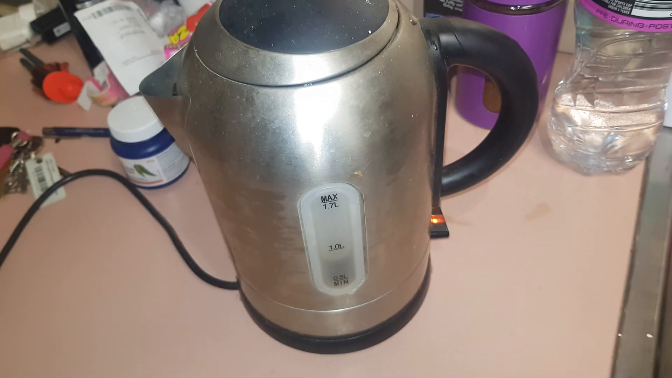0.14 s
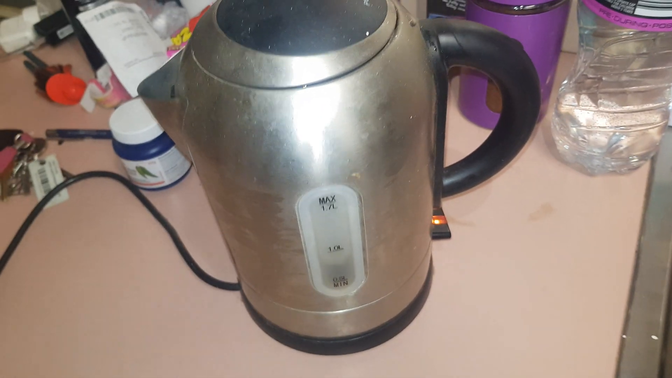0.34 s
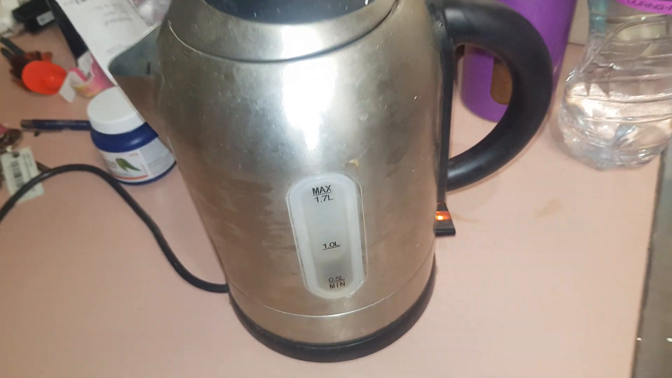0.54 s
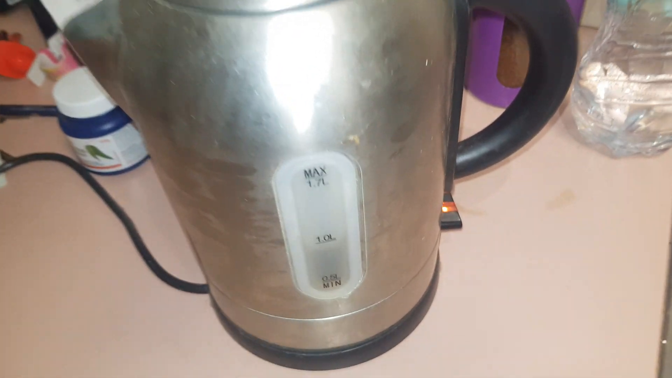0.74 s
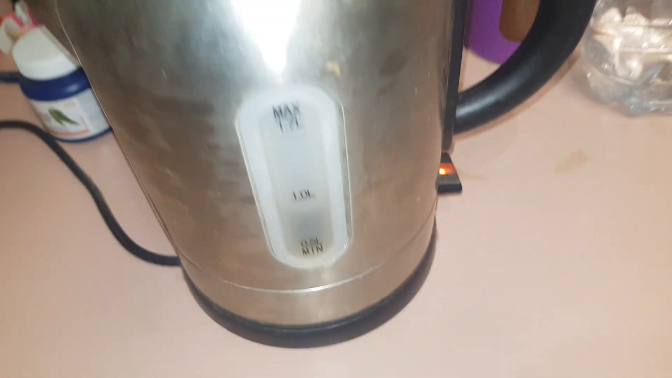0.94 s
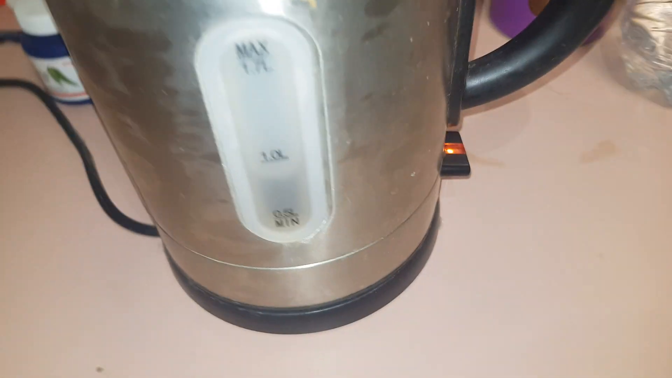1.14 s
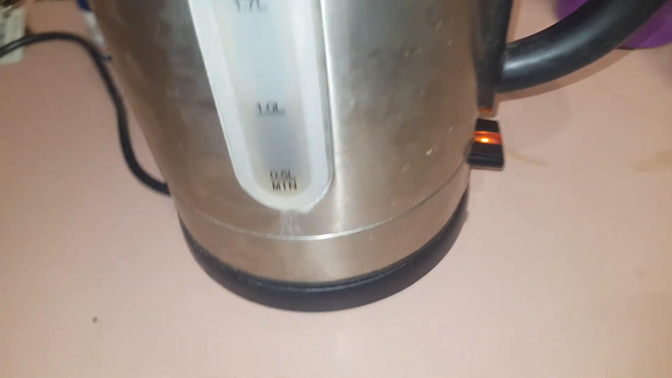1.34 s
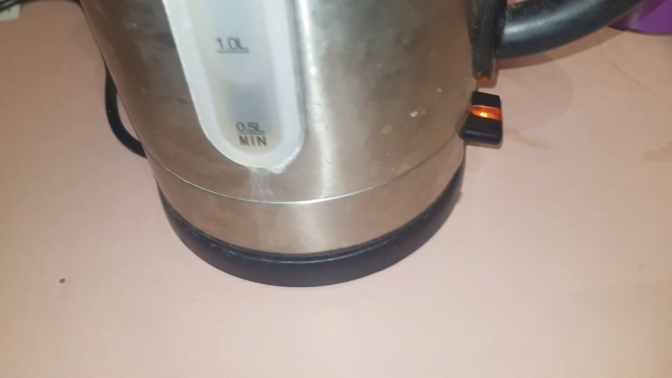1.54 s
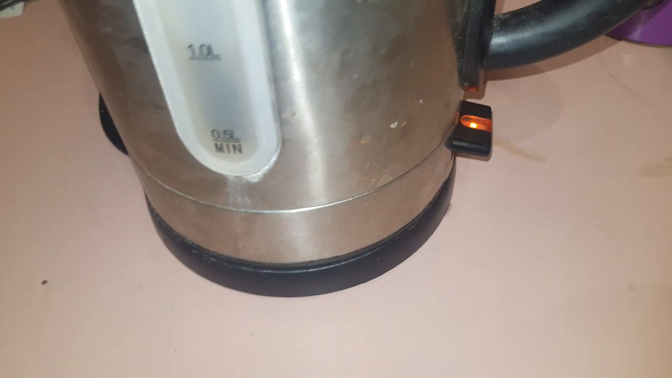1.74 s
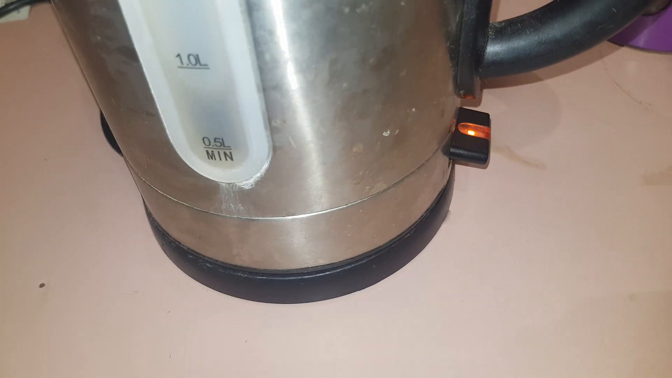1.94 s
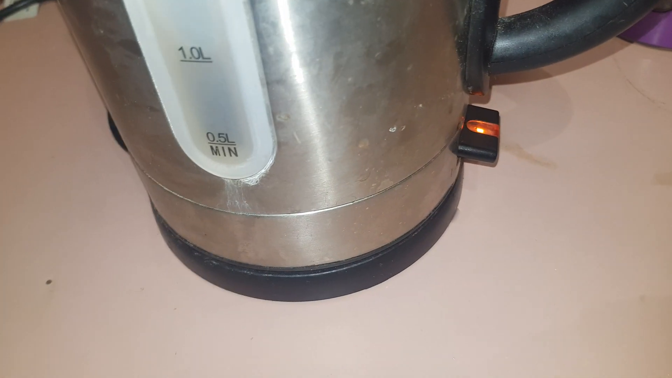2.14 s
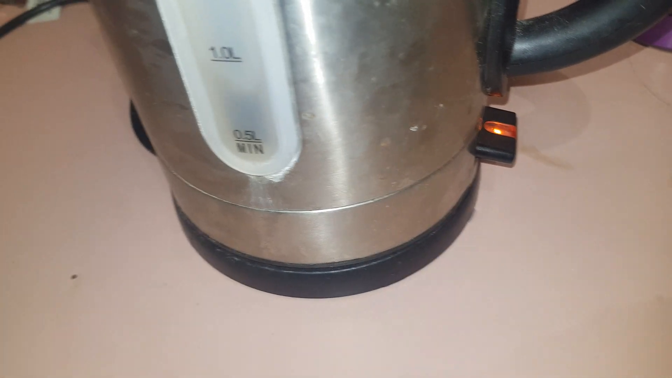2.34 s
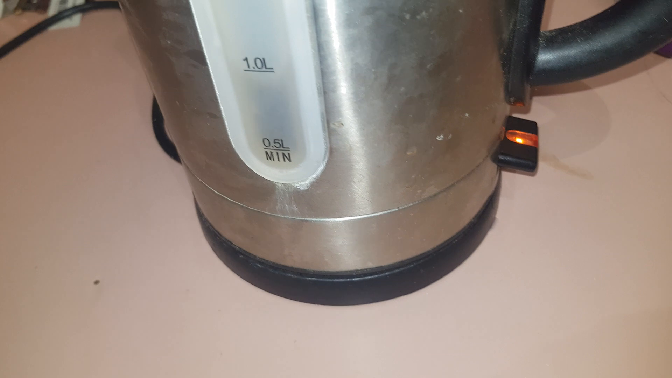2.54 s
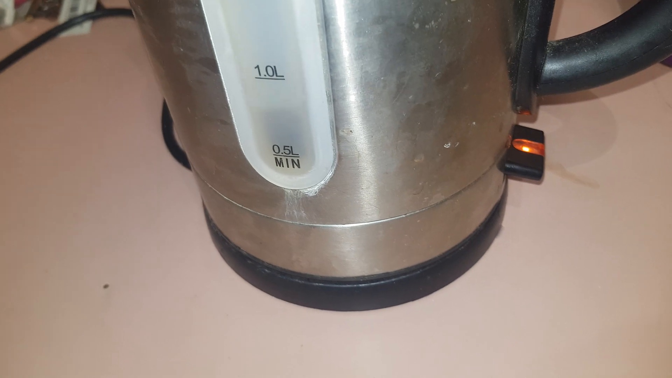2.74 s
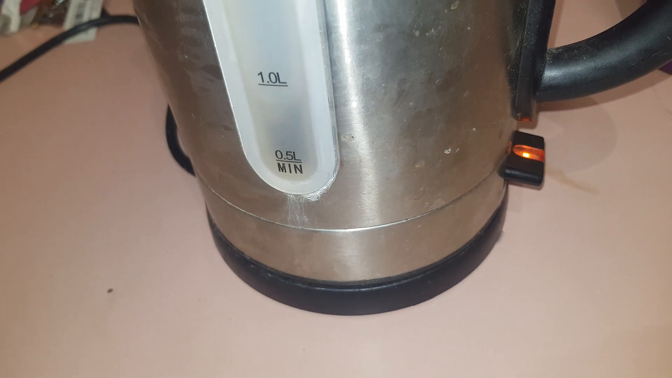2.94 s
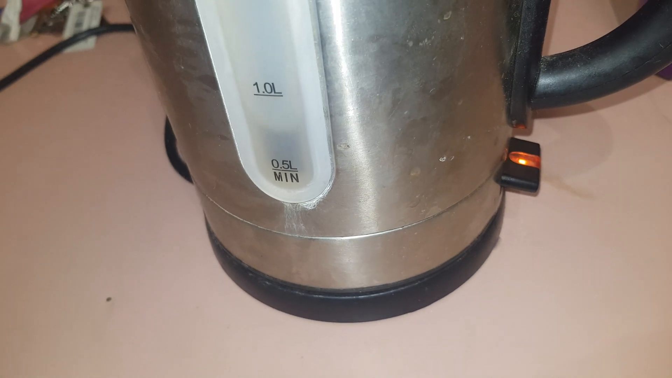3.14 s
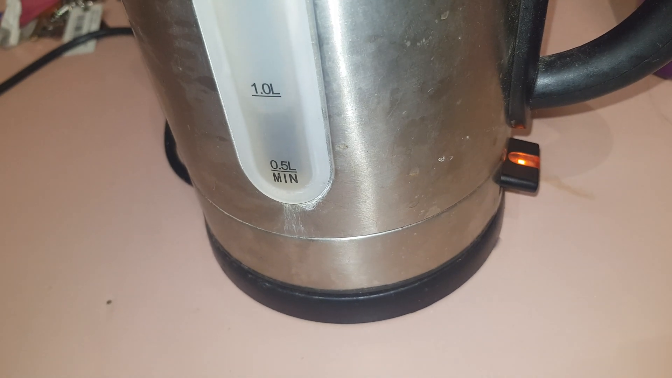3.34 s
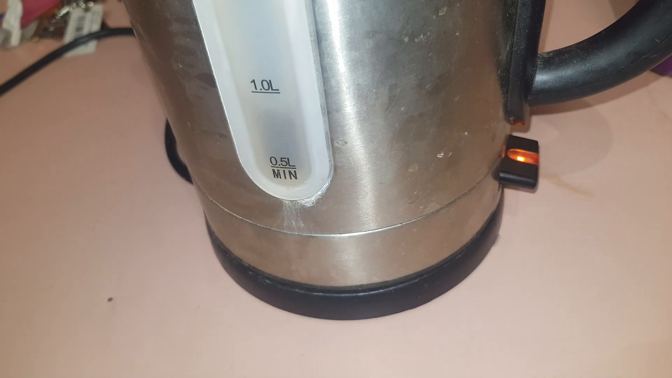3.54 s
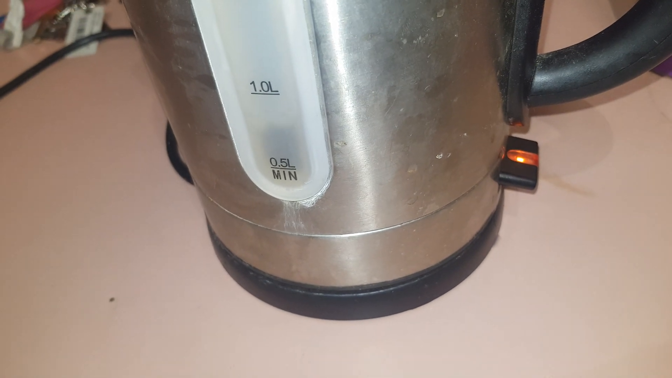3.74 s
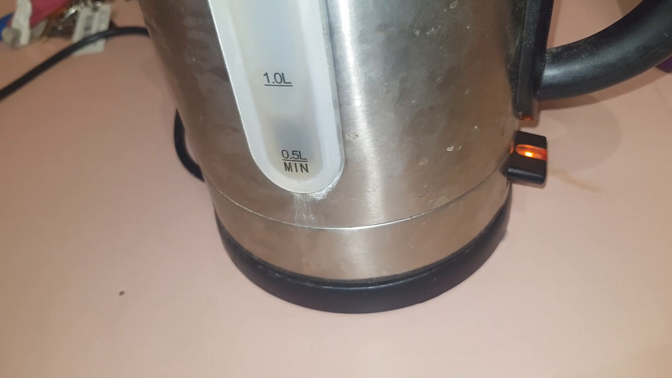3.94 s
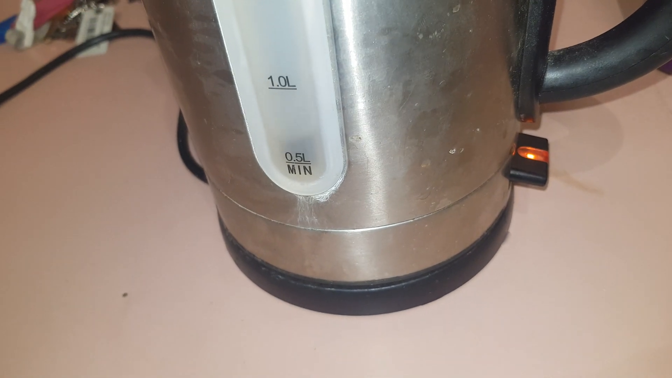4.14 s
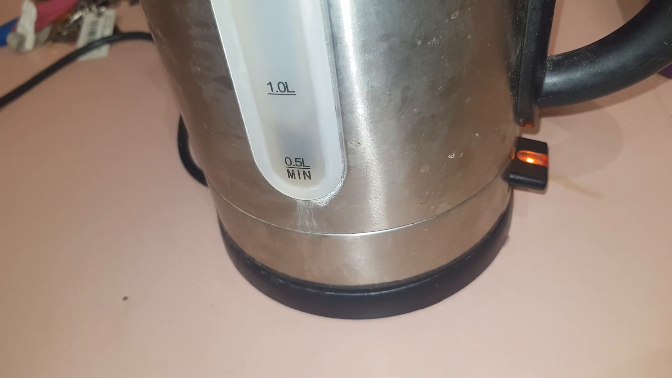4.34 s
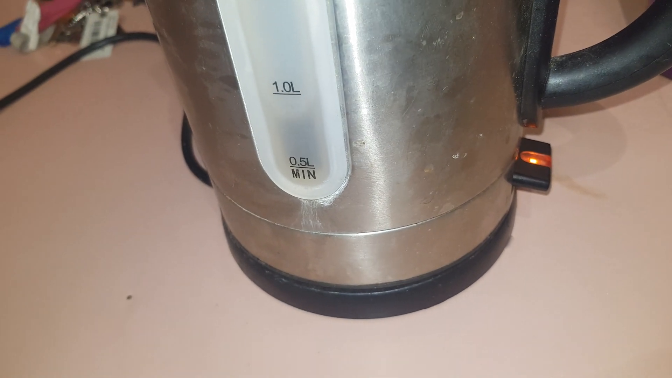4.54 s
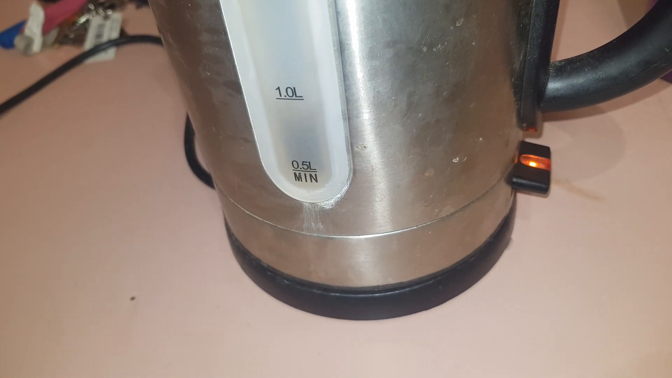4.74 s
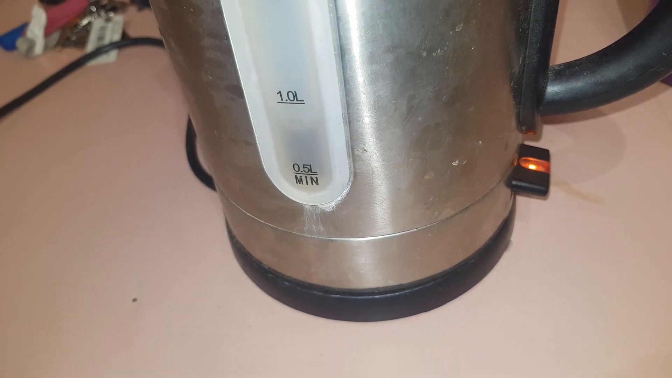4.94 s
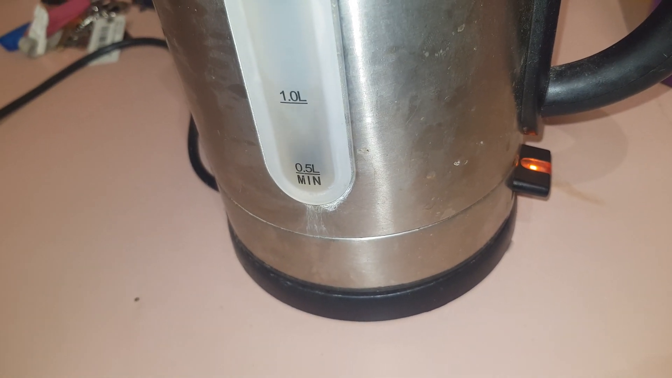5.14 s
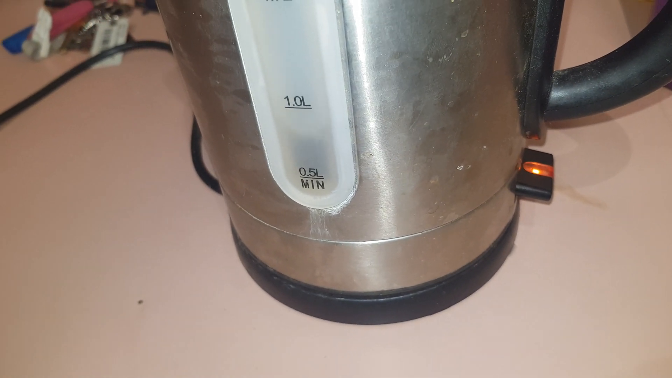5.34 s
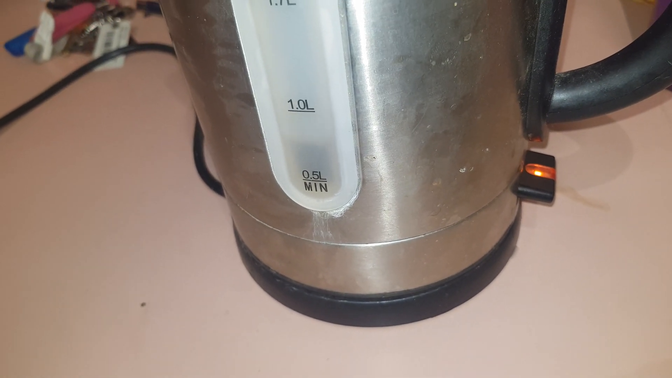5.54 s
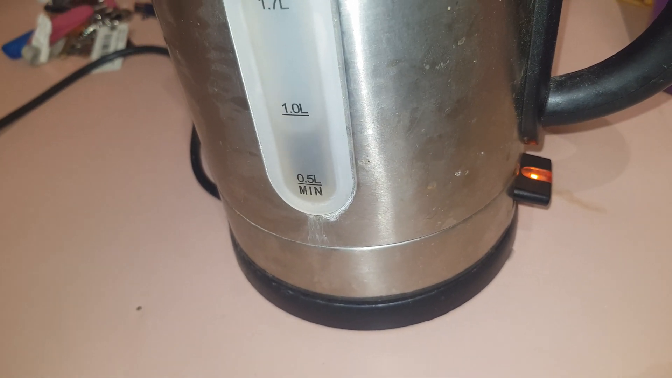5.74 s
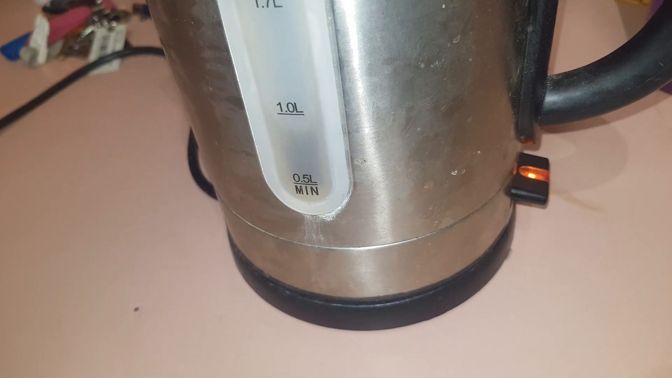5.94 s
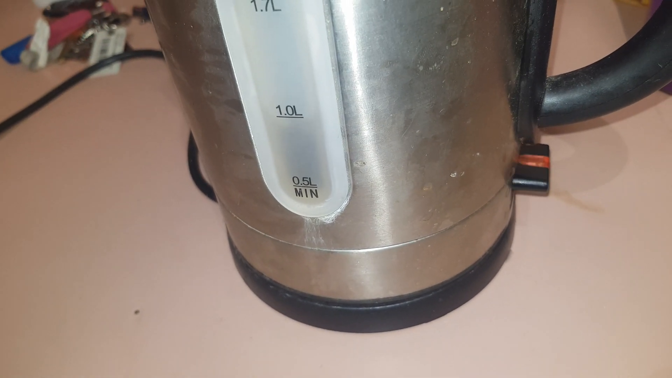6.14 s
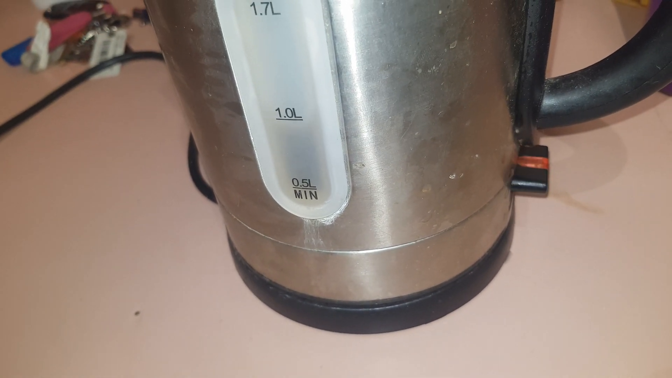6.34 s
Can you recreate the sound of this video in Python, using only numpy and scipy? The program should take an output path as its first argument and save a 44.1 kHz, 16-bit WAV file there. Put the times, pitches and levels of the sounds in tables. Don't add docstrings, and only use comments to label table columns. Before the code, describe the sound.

An electric steel kettle is already boiling hard on a kitchen counter. From 0 s there is a low, lumpy rumble with dull base thumps and soft gurgles, over a faint airy hiss. From 0.6 to 1.5 s the microphone moves in: bubbling and metallic crackle grow fuller, and a few gentle steam wafts pass between 0.7 and 1.4 s. A firm low knock lands at 1.7 s. From 2 to 6 s the boil stays vigorous and irregular, with swelling thumps, hollow bloops, small pops, wet drop ticks and tiny bright spits, densest around 4.2 to 5.6 s. At about 6.1 s a tiny slip leads straight into a hard, bright switch snap, much louder than everything else, rattling through quick bounces within 0.05 s, with a light low thud, a short metallic ring and small-room echo. The water keeps bubbling, slightly easing, until 6.5 s.

```python
import sys
import numpy as np
from scipy import signal
from scipy.fft import rfft, irfft, next_fast_len
from scipy.io import wavfile
from scipy.ndimage import map_coordinates

SR = 44100
rng = np.random.default_rng(int(sys.argv[2]) if len(sys.argv) > 2 else 0)


def master_out(mix):
    frames = np.transpose(np.atleast_2d(mix))
    ceiling = np.clip(frames, -1, 1)
    pcm = np.round(ceiling * 32767).astype(np.int16)
    wavfile.write(sys.argv[1], SR, pcm)


def how_loud(loudness_db):
    steps = np.asarray(loudness_db, float) / 20
    return 10 ** steps


N = 285768

# [t/s, level/dB]
VIGOUR = [
    (0.0, -3),
    (0.6, -2),
    (1.0, -1.5),
    (1.5, 0.5),
    (3.4, 0),
    (4.45, 0),
    (4.85, -0.5),
    (5.2, 0),
    (6.48, -1),
]
# [t/s, length/s, heave/dB, slosh/dB]
SURGES = [(.02, 0.068, 6, 1), (.3, 0.086, 3.5, -6), (.72, 0.06, -0.5, -5), (.85, 0.068, 3.5, 0),
          (1.1, 0.065, 2.5, -0.5), (1.6, 0.055, 0, -1.5), (1.19, 0.022, 10, -16), (1.32, 0.05, 6.5, 2),
          (1.52, 0.082, 5.5, 0.5), (1.7, 0.016, 9, 1), (2.13, 0.2, 3, 0), (2.33, 0.096, 3, 2),
          (2.53, 0.048, 5.5, 1.5), (2.75, 0.21, 3, 0.5), (2.98, 0.099, 3.5, 2.5), (3.25, 0.13, 0, 2),
          (3.45, 0.22, 5, 2.5), (3.74, 0.075, 4.5, 3.5), (3.99, 0.028, 8.5, 0), (4.1, 0.071, 0.5, 6),
          (4.19, 0.019, 7.5, 2.5), (4.3, 0.11, -1.5, 0.5), (4.4, 0.13, 6, 0.5), (4.55, 0.074, 3, 0),
          (4.75, 0.076, 0, -2), (5.07, 0.11, 3, 0.5), (5.23, 0.031, -4.5, 4), (5.5, 0.049, 2.5, -2),
          (5.92, 0.033, 0, 8), (6.12, 0.053, 1.5, 1.5), (6.3, 0.06, 4, 0)]
# [t/s, length/s, level/dB]
HISS_SWELLS = [
    (.7, 0.16, 4.5),
    (1.0, 0.13, 5),
    (1.22, 0.18, 5),
    (1.38, .08, 1),
]
# [f/Hz, width/Hz, level/dB]
COUNTER_MODES = [(55.5, 14, -2), (114.4, 6.6, 3), (132.5, 7.7, 2.5), (175.6, 9.8, 2.5)]
# [f/Hz, width/Hz, level/dB]
BASE_MODES = [(224.3, 12.6, 1.5), (281, 27.2, -3.5), (337.5, 26.4, -7.5), (412, 186, -18.5),
              (450.6, 22.3, 2), (514.5, 37, -3), (549.4, 39, 1.5), (640, 50, -16), (711, 60, -9),
              (880, 330, -18)]
# [f/Hz, width/Hz, level/dB]
SHELL_MODES = [(910, 360, 0.5), (1390, 178, 5.5), (1644, 267, 1.5), (2240, 250, -1), (2530, 280, -7.5),
               (2870, 400, -11), (4120, 810, -14.5), (7550, 270, -40), (11000, 1500, -24)]
BELLY_GROWS = [0.43, 2, 1.3]
# [t/s, peak level/dB, f/Hz]
KNOCKS = [(0.04, -23, 203), (0.962, -26, 260), (1.3, -30, 242), (1.703, -13.5, 220), (1.82, -37, 242),
          (2.753, -18, 240), (2.826, -15, 247), (3.015, -20, 223), (3.062, -23, 276), (3.344, -29, 221),
          (3.632, -24, 233), (3.819, -18, 263), (4.045, -39, 234), (4.323, -16, 270), (4.504, -16, 228),
          (4.603, -15, 232), (4.678, -22.5, 228), (4.724, -32, 202), (4.761, -25, 288), (4.801, -17, 327),
          (4.894, -23, 202), (5.089, -23, 284), (5.248, -30, 202), (5.554, -31, 235), (5.653, -27, 246),
          (5.788, -23, 263), (6.014, -23, 288), (6.04, -12.5, 275)]
# [t/s, peak level/dB, f/Hz]
BLOOPS = [(0.2156, -44, 3549), (0.3925, -32, 417), (0.5616, -39, 900), (0.761, -43, 620),
          (0.9645, -35, 410), (0.9757, -28, 418), (1.0651, -36, 2306), (1.1589, -34, 414),
          (1.301, -32, 630), (1.3089, -33, 420), (1.312, -27, 610), (1.3772, -28, 420),
          (1.5686, -30.5, 426), (1.7677, -43, 1500), (2.0025, -34, 908), (2.0027, -31, 624),
          (2.005, -24, 420), (2.0163, -39, 414), (2.1998, -38, 1509), (2.429, -27.5, 425),
          (2.4983, -39, 908), (2.502, -34, 614), (2.5691, -40, 908), (2.7841, -39, 2306),
          (2.8044, -28, 416), (2.8284, -34, 620), (2.9732, -25.5, 407), (2.9795, -46, 908),
          (2.9942, -39, 414), (3.0274, -43, 900), (3.1062, -41, 620), (3.215, -47, 3549),
          (3.3165, -47, 3549), (3.3524, -49, 3549), (3.3576, -38, 610), (3.4253, -28.5, 417),
          (3.4289, -48, 908), (3.4308, -37, 605), (3.5422, -29.5, 420), (3.5801, -30.5, 414),
          (3.6323, -33, 414), (4.1766, -30, 420), (4.2489, -37, 1509), (4.26, -32, 1509),
          (4.6147, -29, 416), (4.6157, -44, 1509), (4.6827, -41, 908), (4.8935, -25, 417),
          (5.1407, -39, 1509), (5.3097, -30, 417), (5.3272, -37, 1509), (5.3621, -32, 610),
          (5.452, -29, 423), (5.465, -31, 425), (5.5643, -46, 3549), (5.6823, -29, 427),
          (5.6905, -25.5, 407), (5.8016, -30.5, 414), (5.8734, -36, 410), (6.4308, -42, 1509)]
# [t/s, peak level/dB, f/Hz]
BEADS = [(0.6244, -43, 2467), (1.2091, -43, 1774), (1.259, -37, 1161), (1.377, -37, 2380),
         (1.5404, -39, 1774), (1.648, -44, 1774), (1.7687, -43, 3430), (2.0764, -45, 3489),
         (2.105, -40, 5224), (2.1161, -40, 2467), (2.1506, -47, 3489), (2.3385, -44, 1161),
         (2.699, -57, 1774), (2.793, -37, 1774), (2.8216, -40, 1774), (3, -38, 1170), (3.004, -37, 1774),
         (3.003, -48, 3489), (3.157, -41, 1760), (3.3168, -48, 3489), (3.4001, -46, 3489),
         (3.4014, -37, 1760), (3.482, -43, 3489), (3.8715, -39, 1161), (4.1976, -53, 3489),
         (4.204, -44, 3489), (4.218, -39, 2467), (4.218, -43, 1774), (4.2321, -47, 3489),
         (4.26, -38.5, 1774), (4.2672, -38, 1170), (4.3212, -48, 3489), (4.455, -40, 3400),
         (4.6156, -46, 1774), (4.7164, -44, 2467), (4.8018, -39, 1774), (4.9152, -37, 1774),
         (4.933, -37, 1774), (5.002, -40, 3430), (5.0067, -35, 1161), (5.0545, -42, 3489),
         (5.0956, -36, 1774), (5.102, -40, 1774), (5.141, -47, 5224), (5.142, -43, 3489),
         (5.2117, -43, 2467), (5.2317, -46, 1161), (5.325, -38, 1774), (5.343, -37, 1774),
         (5.3724, -44, 1774), (5.466, -38, 1774), (5.4786, -37, 1760), (5.501, -38, 1161),
         (5.502, -43, 3489), (5.571, -37, 2500), (5.6094, -38, 1161), (5.6267, -38.5, 1780),
         (5.8392, -38, 1760)]
# [t/s, peak level/dB, f/Hz]
POPS = [(0.415, -33.5, 853), (1.065, -33, 880), (1.151, -27.5, 890), (1.647, -41, 1480), (2.072, -28, 910),
        (2.271, -32, 880), (2.295, -22.5, 1330), (2.369, -33, 1090), (3.043, -31, 1150), (3.722, -37, 1400),
        (3.753, -27, 1360), (3.874, -32, 1530), (3.925, -33, 930), (4.078, -32, 1670), (4.197, -23.5, 1310),
        (4.25, -31, 1580), (4.455, -27, 1330), (4.613, -37, 1370), (4.761, -25.5, 1430),
        (4.804, -24.5, 1650), (4.838, -35, 890), (5.003, -30, 1510), (5.102, -32, 830), (5.141, -32, 840),
        (5.232, -25, 1490), (5.252, -31.5, 970), (5.371, -28.5, 1670), (5.417, -32, 860), (5.56, -28, 1510),
        (5.912, -31, 1390)]
# [t/s, peak level/dB, f/Hz]
GULPS = [(0.278, -28, 450), (0.671, -25, 514), (0.723, -27, 530), (2.072, -39, 560), (2.756, -38, 480),
         (2.883, -23, 480), (3.815, -41, 574), (4.838, -31.5, 540), (5.233, -42, 455), (5.669, -27.5, 549)]
# [t/s, peak level/dB, f/Hz, t60/s]
PLINKS = [
    (0.047, -35, 1694, 0.084),
    (6.09, -24, 2400, 0.018),
]
# [t/s, peak level/dB, f/Hz, left over right/dB]
DROPS = [(0.3247, -36, 2500, 0), (0.5736, -37, 2200, -1.5), (1.3758, -33, 2200, -0.5),
         (1.6472, -38, 2300, 3), (1.7684, -32, 2260, 6), (1.948, -35, 2240, 3), (2.1041, -38, 2360, 0),
         (2.2942, -38, 2330, -5), (2.3521, -33, 2270, 0), (2.5626, -34.5, 2390, 1),
         (2.7611, -37.5, 2330, 5), (3.044, -36, 2100, -4), (3.1228, -37.5, 2260, 1),
         (3.2809, -35.5, 2540, 1), (3.3164, -36, 2240, 2), (3.8147, -30.5, 2680, 10),
         (3.9015, -35, 2230, 5), (4.1979, -40, 2200, -3), (4.2492, -36, 2250, -1.0),
         (4.337, -31.5, 2370, 5), (4.4538, -37.5, 2330, 0), (4.6139, -31, 2430, 3), (4.7616, -36, 2290, 7),
         (4.8529, -35, 2200, -3), (4.9127, -41, 2440, 10), (5.0015, -32, 2410, 3), (5.033, -40, 2430, 2.0),
         (5.1018, -36, 2250, 1), (5.3243, -42, 2160, 1), (5.4286, -36, 2460, 5),
         (0.052, -40, 2220, -1), (1.4825, -37, 2250, 4), (1.5406, -45, 2190, -1),
               (1.937, -40, 2220, -2), (2.17, -40, 2530, 6), (2.893, -38.5, 2000, 3),
               (3.2163, -39, 2350, 4), (3.7304, -42, 2340, -3), (3.757, -39.5, 2230, -1),
               (3.864, -45, 2280, 12), (3.912, -35.5, 2200, 2.0), (4.231, -38, 2220, 0),
               (4.385, -36, 2220, 1), (4.488, -38, 2300, 2), (4.7117, -43, 2290, -6),
               (4.733, -33.5, 2110, 3), (4.805, -48, 2030, -1), (4.8804, -41, 2230, -2),
               (4.983, -38, 2490, 4.5), (5.048, -33.5, 2240, 3), (5.142, -43, 2240, -5),
               (5.1947, -39, 2680, 5), (5.23, -38, 2370, 2), (5.561, -36, 2010, 5), (5.736, -44, 2480, 8),
               (6.3288, -27.5, 2290, 3), (6.3954, -43, 2240, 9), (6.4313, -49, 2260, 1.0)]
# [t/s, peak level/dB, f/Hz]
SPITS = [(0.304, -43, 7410), (0.445, -40, 5970), (0.662, -42, 11300), (1.0508, -36.5, 7360),
         (1.7679, -52, 5270), (1.8004, -47, 5010), (2.104, -30, 10400), (2.311, -40, 6120),
         (2.3391, -45, 11900), (2.5162, -46, 11400), (2.8846, -38, 11200), (2.9642, -44, 5020),
         (3.0031, -46, 11000), (3.1073, -44, 10800), (3.281, -45, 5110), (3.317, -44, 10600),
         (3.8147, -48, 6550), (4.196, -38, 5150), (4.3372, -39, 7000), (4.454, -43, 5800),
         (5.004, -42.5, 6980), (5.1417, -50, 5400), (5.3253, -48, 11800), (5.4271, -44, 6710),
         (5.465, -45, 10900), (5.5034, -43, 11800), (5.5647, -37.5, 7610), (5.6124, -36, 12700),
         (5.8945, -44, 5850), (5.9459, -47, 9660)]
# [t/s, peak level/dB, t60/s]
EARLY_CONTACTS = [
    (6.105, -46, .01),
    (6.111, -19, .03),
    (6.1138, -17, .03),
]
# [t/s, peak level/dB, t60/s]
CONTACTS = [
    (6.122, -5, 0.015),
    (6.1241, -12, 0.016),
    (6.13, -18, 0.022),
    (6.135, -22, .03),
    (6.146, -21.5, 0.032),
    (6.156, -31, 0.031),
    (6.168, -44, 0.032),
]
# [f/Hz, level/dB, t60/s]
LEVER_RING = [(731, 0, 0.23), (1634, -4, 0.28), (1490, -2, 0.25), (1710, -3, 0.25), (2330, 20, 0.02),
              (2160, 3, 0.15), (2200, 3, 0.19), (2345, -10, 0.15), (2470, -4, 0.15), (2750, -12, .15),
              (2200, 9, 0.037), (3234, -2, 0.1), (3170, -4, 0.13), (4060, -17, .12)]
# [t/s, peak level/dB, f/Hz, t60/s]
LEVER_THUD = [
    (6.14, -20.5, 356, 0.029),
    (6.128, -27, 98, 0.29),
]
# [f/Hz, density level/dB]
SNAP_COLOUR = [(290, -39), (500, -10), (728, -6.5), (958, -11), (1520, -7.5), (1810, -7.5), (2350, -1.5),
               (3200, -10), (3900, -5), (5800, -24), (6950, -16.5), (7600, -19), (9810, -19.5),
               (11000, -10), (12200, -16), (15800, -22.5)]
# [f/Hz, density level/dB]
HISS_COLOUR = [(1800, -1.5), (3000, -4.5), (5800, -13.5), (7250, -8), (8400, -14), (11100, -7),
               (13000, -13.5), (15700, -16)]
# [f/Hz, left over right/dB]
KETTLE_BALANCE = [(60, 8.5), (110, 8.5), (200, 7.5), (380, 9.5), (700, 10.0), (1290, 5.0), (2380, 1.0),
                  (4400, 2.5), (8120, 4.0), (15000, 4.0)]
# [f/Hz, left over right/dB]
SWITCH_BALANCE = [(500, 20.5), (1200, -1), (2300, 3.5), (4200, 2), (7000, 9), (9000, 8.5), (11000, -2),
                  (14000, 9)]
# [f/Hz, likeness 0..1]
KETTLE_LIKENESS = [(60, .92), (130, .94), (290, .86), (640, .76), (1410, .4), (3100, .25), (6800, 0)]
# [f/Hz, likeness 0..1]
SWITCH_LIKENESS = [(500, 1), (1300, 0.68), (2300, 0.54), (4200, 0.76), (8000, 0.5)]
# [f/Hz, left lead/rad]
BOIL_LEAD = [(55, -.25), (90, -.18), (125, 0), (200, .55), (330, .36), (420, 0), (560, -.5), (720, 0)]
# [f/Hz, left lead/rad]
SWITCH_LEAD = [(0, 0), (1460, -0.2), (6720, -36.0), (9300, -33.3), (11600, -45.7), (14700, -39.5),
               (16400, -41.0)]
# [f/Hz, t60/s]
KITCHEN_DECAY = [(400, 0.44), (2000, 0.28), (4000, 0.26), (7000, 0.27), (14000, 0.23)]

RUMBLE_DB, GURGLE_DB, BURBLE_DB, CRACKLE_DB, PRICK_DB = -33, -38.5, -44.5, -50, -56
RUMBLE_GROWS, GURGLE_GROWS, BURBLE_GROWS, CRACKLE_GROWS, PRICK_GROWS = 0.22, 1.26, 0.066, 0.28, 2.4
BURBLE_SLOSH = 0.29
HISS_DB, TOP_HISS_DB, TOP_SWELLS = -63, -67.5, 1.1
STRIKE = 2.9


def unit(x):
    return x / np.sqrt(np.mean(x ** 2) + 1e-20)


def along(points, hz):
    f, v = np.transpose(points)
    return np.interp(np.log(hz + 1), np.log(f + 1), v)


def curves(rows):
    s, *cols = np.transpose(rows)
    return [np.interp(np.arange(N) / SR, s, c) for c in cols]


def swells(rows):
    s, length, *cols = np.transpose(rows)
    t = np.arange(0, N + 64, 64) / SR
    bell = np.exp(-.5 * ((t - s[:, None]) / (.5 * length[:, None])) ** 2)
    return [np.interp(np.arange(N) / SR, t, c @ bell) for c in cols]


def wobble(rate):
    knots = rng.standard_normal(int(N * rate / SR) + 4)
    return map_coordinates(knots, [np.arange(N) * rate / SR])


def filtered(x, response):
    m = next_fast_len(N + SR // 2)
    return irfft(rfft(x, m) * response(np.fft.rfftfreq(m, 1 / SR)), m)[..., :N]


def highpass(x, edge_hz, order):
    return filtered(x, lambda hz: (1j * hz / (edge_hz + 1j * hz)) ** order)


def resonances(modes):
    def response(f):
        total = 0
        for k, (centre, width, db) in enumerate(modes):
            damping = 1j * f * width
            total = total + (-1) ** k * how_loud(db) * damping / (centre * centre - f * f + damping)
        return total
    return response


def collapses(count, spread_db):
    when, size = rng.random((count, 2)).T
    return np.bincount((when * N).astype(int), how_loud(-spread_db * np.log(1.004 - size)), N)


def fading(x, t60):
    return signal.lfilter([1], [1, -how_loud(-60 / (t60 * SR))], x)


def puff(hz, width, t60):
    t = np.arange(SR // 10) / SR
    b, a = signal.iirpeak(hz, 1 / width, SR)
    burst = (rng.standard_normal((2, len(t))) + STRIKE * (t == 0)) * how_loud(-60 * t / t60)
    burst = signal.lfilter(b, a, signal.lfilter(b, a, burst))
    return burst / np.abs(burst).max()


def soft_tones(rows, rise):
    out = np.zeros(N)
    for s, db, hz, t60 in rows:
        t = np.clip(np.arange(N) / SR - s, 0, None)
        out += how_loud(db - 60 * t / t60) * (1 - np.exp(-t / rise)) * np.sin(2 * np.pi * hz * t)
    return out


def add_at(out, s, sound):
    start = round(s * SR)
    out[..., start:start + sound.shape[-1]] += sound


def panned(db):
    return how_loud([[db / 2], [-db / 2]])


def ports(pair, balance, alike):
    def mix(hz):
        turn = np.arccos(np.clip(along(alike, hz), -1, 1)) / 2
        return np.array([np.cos(turn), np.sin(turn)])
    mid, side = filtered(pair, mix)
    both = np.array([mid + side, mid - side])
    return filtered(both, lambda hz: how_loud(np.outer([.5, -.5], along(balance, hz))))


def leading(pair, lead):
    return filtered(pair, lambda hz: np.exp(.5j * np.outer([1, -1], along(lead, hz))))


def hiss():
    swell_db, = swells(HISS_SWELLS)

    def top_share(hz):
        return np.clip((hz - 11500) / 2500, 0, 1)

    def colour(hz):
        return how_loud(along(HISS_COLOUR, hz))

    low = unit(filtered(rng.standard_normal((2, N)), lambda hz: colour(hz) * np.sqrt(1 - top_share(hz))))
    top = unit(filtered(rng.standard_normal((2, N)), lambda hz: colour(hz) * np.sqrt(top_share(hz))))
    flutter = how_loud(0.9 * wobble(12))
    low = how_loud(HISS_DB + swell_db + 6.5) * low
    top = how_loud(TOP_HISS_DB + TOP_SWELLS * swell_db + 5.0) * top
    return flutter * (low + top) * panned(3.6)


def kitchen(x):
    hz, t, z = signal.stft(rng.standard_normal((2, SR // 2)), SR, nperseg=256)
    fade = how_loud(-60 * t / along(KITCHEN_DECAY, hz)[:, None])
    tail = signal.istft(z * fade, SR, nperseg=256)[1]
    late = np.pad(x, ((0, 0), (200, 0)))
    return signal.fftconvolve(late, tail / np.linalg.norm(tail[0]), axes=1)[:, :N]


def thud():
    return soft_tones(LEVER_THUD, rise=0.00057) * panned(8)


def switch():
    crack, ring, t = np.zeros(N + SR), np.zeros((2, N + SR)), np.arange(SR // 3) / SR
    for s, db, t60 in EARLY_CONTACTS + CONTACTS:
        add_at(crack, s, how_loud(db - 3.0 - 60 * t / t60))
        for hz, level_db, ring_t60 in LEVER_RING:
            phase = rng.uniform(0, 2 * np.pi, (2, 1))
            level = how_loud(db + level_db - 21.5 - 60 * t / min(0.43 * ring_t60, .25))
            add_at(ring, s, level * np.sin(2 * np.pi * hz * t + phase))
    noise = unit(filtered(rng.standard_normal((2, N)), lambda hz: how_loud(along(SNAP_COLOUR, hz))))
    heard = ports(crack[:N] * noise + ring[:, :N], SWITCH_BALANCE, SWITCH_LIKENESS)
    return highpass(leading(heard, SWITCH_LEAD), edge_hz=100, order=2)


def plinks():
    return soft_tones(PLINKS, rise=0.0065)


def splashes():
    out = np.zeros((2, N + SR))
    for s, db, hz, pan_db in DROPS:
        drop = puff(hz, width=0.53, t60=0.021)
        spray = how_loud(-19) * puff(7500, width=1.7, t60=0.013)
        add_at(out, s, how_loud(db + 3.0) * (drop + spray) * panned(pan_db))
    for s, db, hz in SPITS:
        add_at(out, s, how_loud(db + 1.5) * puff(hz, width=1.16, t60=0.024) * panned(9))
    for s, db, hz in POPS + GULPS:
        add_at(out, s, how_loud(db - 4.0) * puff(hz, width=0.33, t60=0.022) * panned(5))
    return out[:, :N]


def beads():
    out = np.zeros((2, N + SR))
    for s, db, hz in BEADS:
        add_at(out, s, how_loud(db + 3) * puff(hz, width=0.43, t60=0.027) * panned(3))
    return out[:, :N]


def pricks(level_db):
    shell = 0
    for modes in (SHELL_MODES[:4], SHELL_MODES[2:6], SHELL_MODES[3:7]):
        puffs = fading(collapses(count=1500, spread_db=0.0), t60=0.011)
        shell = shell + filtered(unit(puffs) * rng.standard_normal((2, N)), resonances(modes))
    return how_loud(level_db) * unit(ports(shell, KETTLE_BALANCE, KETTLE_LIKENESS))


def crackle(level_db, vigour_db):
    clumps = how_loud(1.8 * wobble(25))

    def push():
        puffs = fading(collapses(count=1500, spread_db=2.5) * clumps, t60=0.027)
        return (0.59 + unit(puffs)) * rng.standard_normal((2, N))

    shell, belly_push = 0, push()
    for k, (mode, grows) in enumerate(zip(SHELL_MODES[:3], BELLY_GROWS)):
        near = how_loud(grows * vigour_db)
        shell = shell + (-1) ** k * near * filtered(belly_push, resonances([mode]))
    for modes in (SHELL_MODES[3:5], SHELL_MODES[5:]):
        shell = shell + filtered(push(), resonances(modes))
    return how_loud(level_db + 0.93) * unit(ports(shell, KETTLE_BALANCE, KETTLE_LIKENESS))


def knocks(rows, cycles, extra_db):
    out, t = np.zeros(N + SR), np.arange(SR // 10) / SR
    for s, db, hz in rows:
        level = how_loud(db + extra_db - 60 * t * hz / cycles) * (1 - np.exp(-t * hz / 0.42))
        add_at(out, s, -level * np.sin(2 * np.pi * hz * t))
    return out[:N] * how_loud([[3.5], [-5]])


def thumps(level_db, modes, count, spread_db):
    body = 0
    for pair in zip(modes[::2], modes[1::2]):
        push = collapses(count, spread_db) * rng.choice([-1, 1], N)
        diffuse = unit(fading(np.abs(push), t60=0.092)) * rng.standard_normal(N)
        body = body + filtered(np.array([unit(push), unit(diffuse)]), resonances(pair))
    return how_loud(level_db + 2.0) * unit(ports(body, KETTLE_BALANCE, KETTLE_LIKENESS))


def boil(vigour_db):
    heave_db, slosh_db = swells(SURGES)
    rumble_db = RUMBLE_DB + RUMBLE_GROWS * vigour_db + heave_db
    gurgle_db = GURGLE_DB + GURGLE_GROWS * vigour_db + slosh_db
    burble_db = BURBLE_DB + BURBLE_GROWS * vigour_db + BURBLE_SLOSH * (heave_db + slosh_db)
    out = thumps(rumble_db, COUNTER_MODES, count=4000, spread_db=2.0)
    out = out + thumps(gurgle_db, BASE_MODES[:4], count=1500, spread_db=2.0)
    out = out + thumps(burble_db, BASE_MODES[4:], count=2500, spread_db=3.0)
    out = out + knocks(KNOCKS, cycles=10.2, extra_db=-2.5)
    out = out + knocks(BLOOPS, cycles=10.1, extra_db=5.5)
    return leading(out, BOIL_LEAD)


def scene():
    vigour_db, = curves(VIGOUR)
    near = switch() + thud() + splashes() + plinks()
    out = hiss() + near + how_loud(-9.5) * kitchen(near)
    out = out + beads() + pricks(PRICK_DB + PRICK_GROWS * vigour_db)
    out = out + crackle(CRACKLE_DB + CRACKLE_GROWS * vigour_db, vigour_db)
    return out + boil(vigour_db)


def top_cut(x):
    return signal.sosfilt(signal.butter(12, 16800, fs=SR, output="sos"), x)


def record(dry):
    x = signal.sosfilt(signal.butter(5, 46, "high", fs=SR, output="sos"), dry)
    x = x / (1 + np.abs(x / .8) ** 4) ** .25
    x = filtered(x, lambda hz: hz < 15800)
    return top_cut(x)


dry = scene()
out = record(dry)
master_out(out)
```